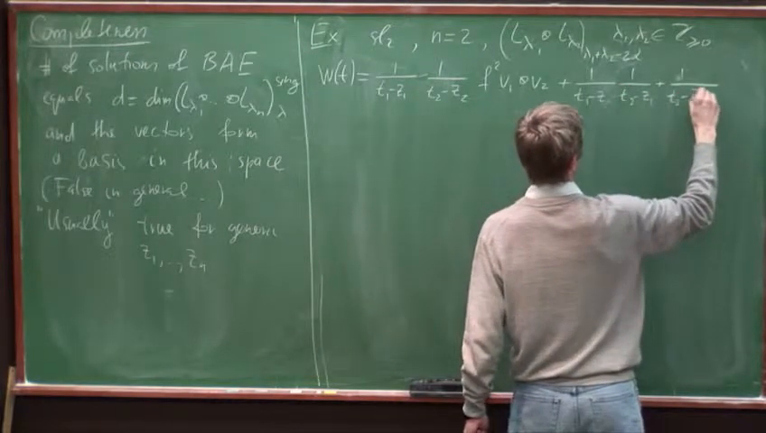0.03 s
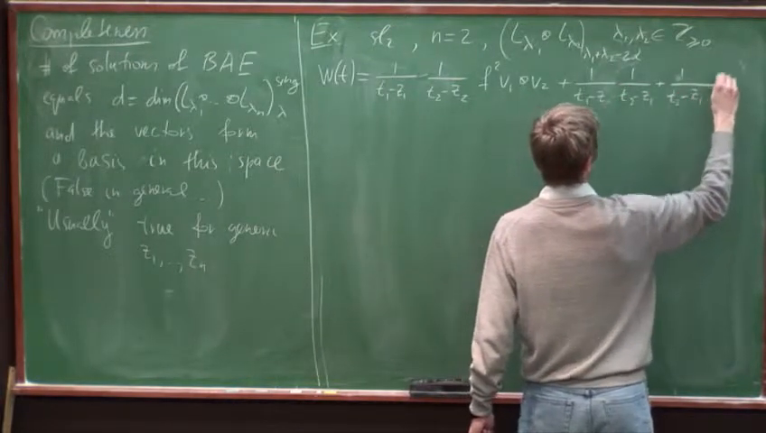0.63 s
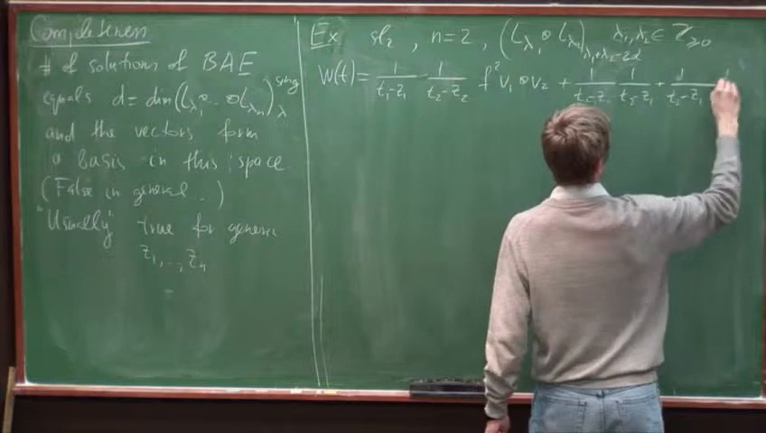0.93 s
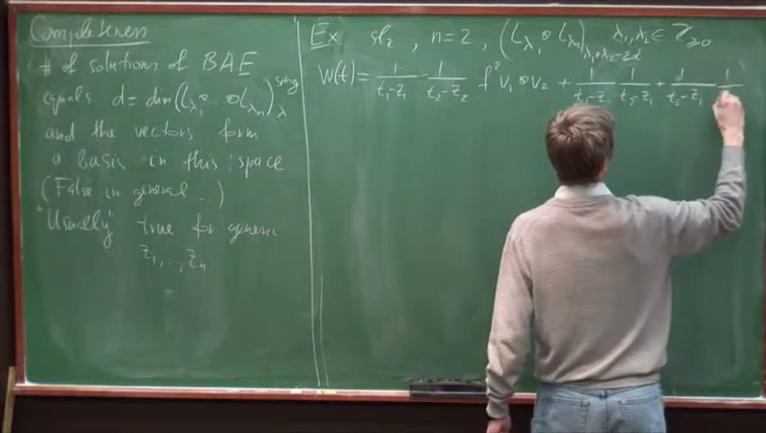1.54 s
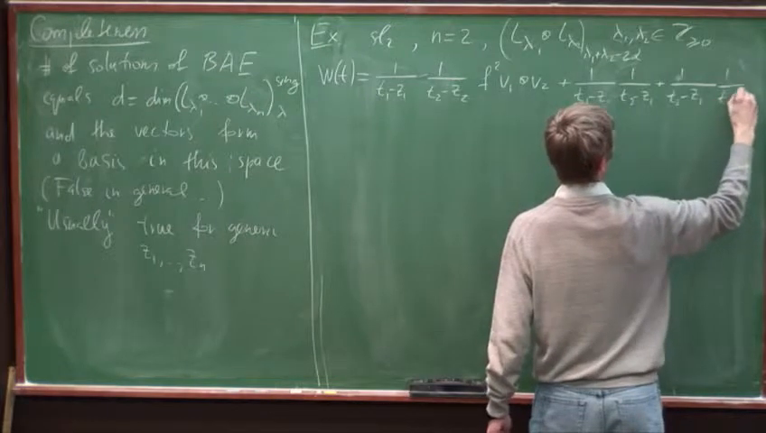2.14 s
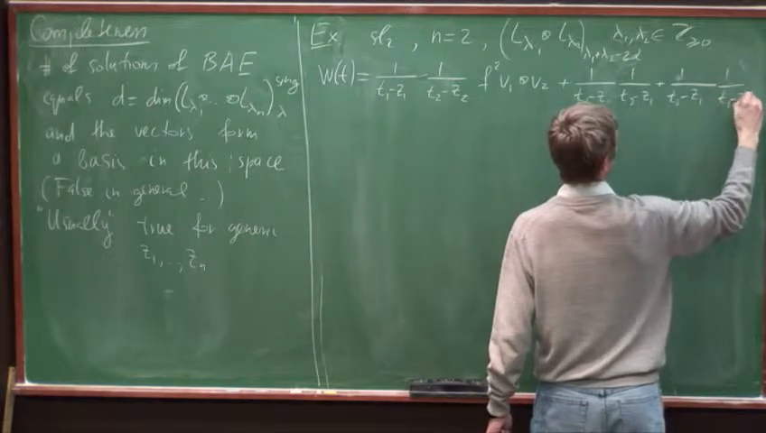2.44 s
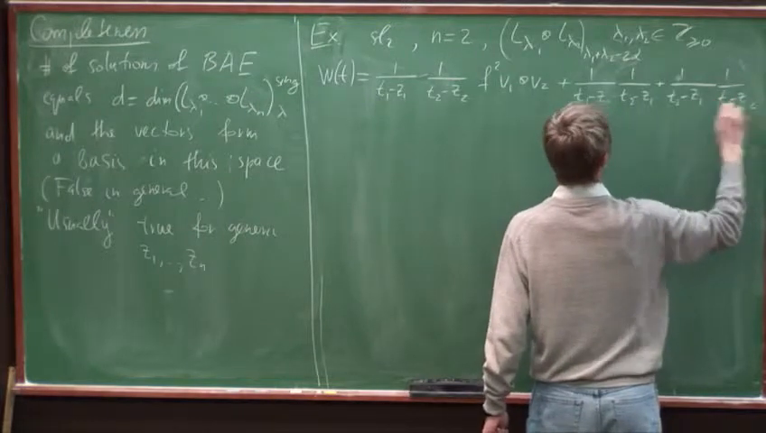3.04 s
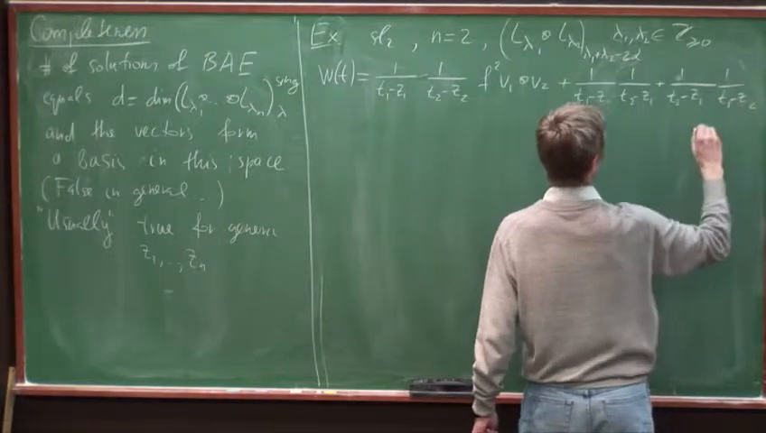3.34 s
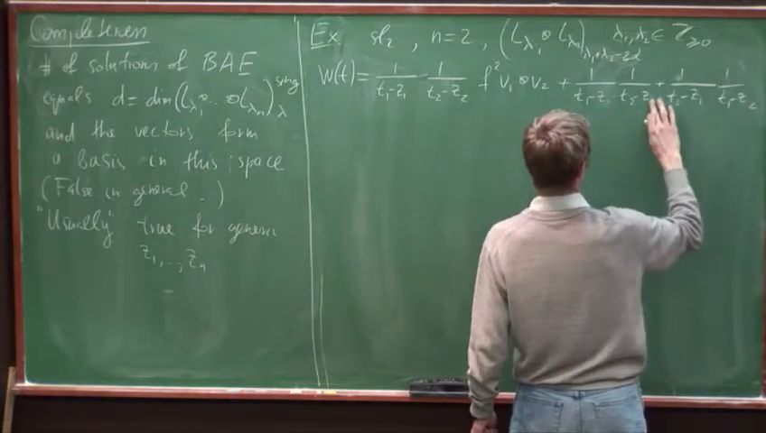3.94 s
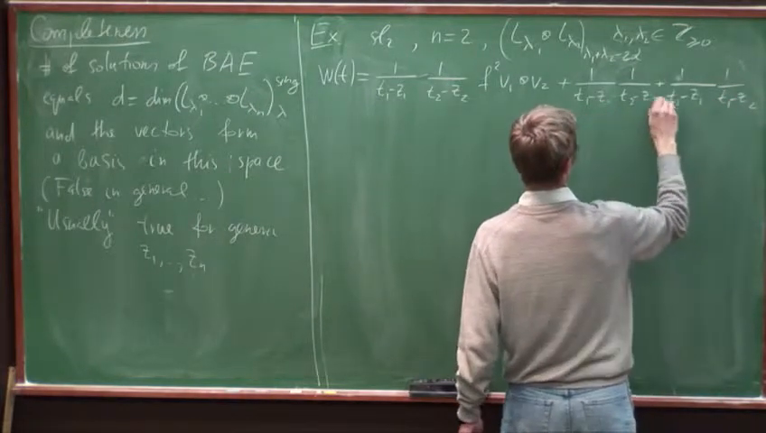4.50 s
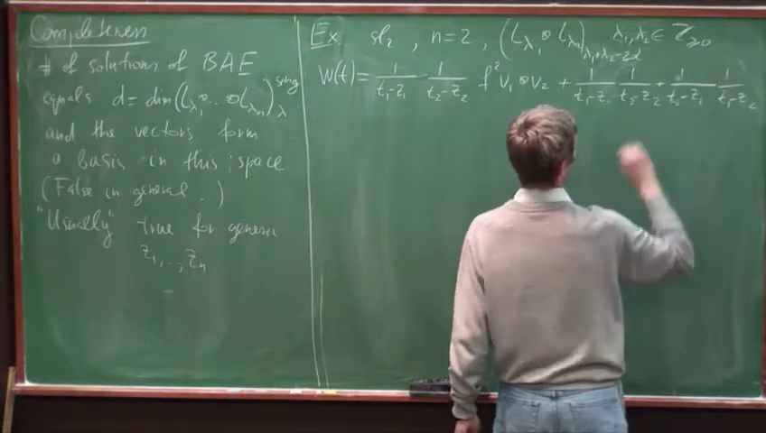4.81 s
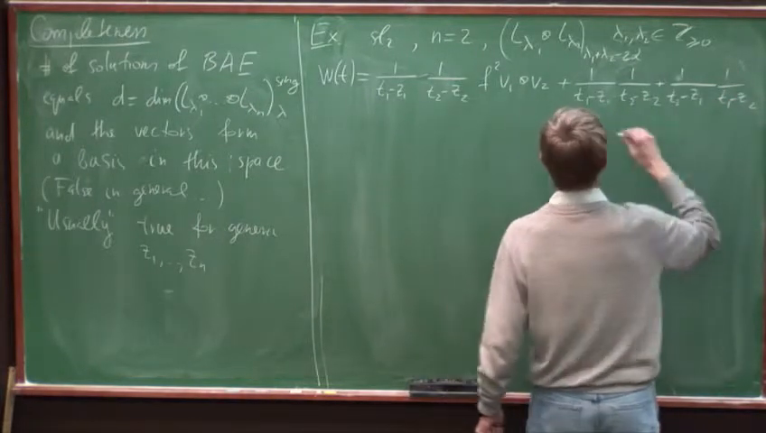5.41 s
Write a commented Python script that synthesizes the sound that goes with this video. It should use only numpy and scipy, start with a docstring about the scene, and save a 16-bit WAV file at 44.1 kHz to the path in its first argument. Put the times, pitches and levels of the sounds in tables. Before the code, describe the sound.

A quick run of sharp chalk knocks on a blackboard, then a short pause and a last tap and scrape, with faint ventilation behind.

```python
"""A lecture room, one microphone at the blackboard (left) and one four metres further off (right).
Chalk taps out a formula: each touch knocks the panel, sets it ringing and fills the room.
Light strokes hiss in between, and small things click and bump near the far microphone.
Ventilation hums; in the pause a noise gate shuts out the room, leaving the electronics' buzz and hiss."""
import sys
import numpy as np
from scipy import signal
from scipy.fft import rfft, irfft
from scipy.io import wavfile
from scipy.ndimage import uniform_filter1d

SR = 44100
rng = np.random.default_rng(int(sys.argv[2]) if len(sys.argv) > 2 else 0)


def wav_out(sig):
    """Save sig, one row per channel (or a flat mono array), as 16-bit PCM at SR to the path in sys.argv[1]."""
    wavfile.write(sys.argv[1], SR, np.round(np.clip(np.atleast_2d(sig).T, -1, 1) * 32767).astype(np.int16))


N = 245346
TIME = np.arange(N) / SR


def from_db(db):
    """Decibels to gain."""
    return 10 ** (np.asarray(db) / 20)


def at_hz(points, hz):
    """Read a table along a log-frequency axis."""
    points = np.array(points)
    return np.interp(np.log(hz), np.log(points[:, 0]), points[:, 1])


def bins(size):
    """The frequencies of a transform, kept above zero."""
    return np.maximum(np.fft.rfftfreq(size, 1 / SR), 1)


def noise(gain, size):
    """Noise with a gain for each frequency; rms near 1."""
    return irfft(rfft(rng.standard_normal(size)) * gain / np.sqrt(np.mean(gain ** 2)), size)


def shaped(spectrum, size):
    """Noise that follows the shape of a spectrum table; rms near 1."""
    return noise(from_db(at_hz(spectrum, bins(size))), size)


def add(track, s, sound):
    """Mix a sound into a track from a given moment on."""
    start = max(round(s * SR), 0)
    track[start:start + len(sound)] += sound[:N - start]


def delayed(x, s):
    """The same sound, later."""
    return np.interp(TIME - s, TIME, x, left=0)


def high_pass(x, hz, order):
    """Thin out the bass."""
    return signal.sosfilt(signal.butter(order, hz, "high", fs=SR, output="sos"), x)


def dying(t, t60):
    """A decay of 60 dB in t60."""
    return np.exp(-np.log(1000) * t / t60)


def mode(hz, db, t60, t):
    """A struck mode: one decaying sine."""
    return from_db(db) * np.sin(2 * np.pi * hz * t) * dying(t, t60)


def fade_by_band(x, t60s):
    """Each region of the spectrum dies away at its own rate."""
    size = len(x)
    centres, times = np.transpose(t60s)
    spectrum, log_hz, t = rfft(x), np.log(bins(size)), np.arange(size) / SR
    shares = [np.interp(log_hz, np.log(centres), row) for row in np.eye(len(centres))]
    return sum(irfft(spectrum * share, size) * dying(t, t60) for share, t60 in zip(shares, times))


def swell(length, size):
    """A quick rise and softer fall that last a given time."""
    return np.sin(np.pi * np.sqrt(np.minimum(np.arange(size) / SR / length, 1)))


def burst(length, hz, width_hz, size):
    """A short swell of noise in one broad, steep-sided resonance."""
    f = bins(size)
    return swell(length, size) * noise(1 / (1 + ((f - hz ** 2 / f) / width_hz) ** 2), size)


# air rush at both microphones: f/Hz, relative density/dB
AIR_RUSH = [(25, -13), (60, 1), (80, 0), (100, -0.5), (160, 0.5), (220, 5), (300, 2.5), (500, 0.5),
            (900, -2), (1500, -6.5), (3000, -13), (6000, -15), (15000, -20)]
# fan motor: f/Hz, level at the board/dB, level far off/dB (both before the hum's envelope)
FAN_MOTOR = (119.5, -67, -73.5)
# duct drones: f/Hz, width/Hz, level at the board/dB, level far off/dB (likewise)
DUCT_DRONES = [(117, 51, -69.5, -83), (147, 17, -63.5, -87), (175.7, 9.7, -69.5, -84)]


def ventilation(near_db=-66.5, far_db=-68, hum_db=1.2, hold_s=2.4, sink_db_per_s=2):
    """Room tone: steady air rush, with a motor hum and wavering duct drones that hold, then sink."""
    rush = np.array([from_db(db) * shaped(AIR_RUSH, N) for db in (near_db, far_db)])
    motor_hz, *motor_db = FAN_MOTOR
    hum = from_db(motor_db)[:, None] * np.sqrt(2) * np.sin(2 * np.pi * motor_hz * TIME)
    for hz, width, *mics_db in DUCT_DRONES:
        resonance = 1 / (1 + ((bins(N) - hz) / width) ** 2) ** 2
        hum += from_db(mics_db)[:, None] * noise(resonance, N)
    envelope = from_db(hum_db - sink_db_per_s * np.maximum(TIME - hold_s, 0))
    return rush + hum * envelope


# outline of the mains harmonics: f/Hz, level of each/dB
MAINS_BUZZ = [(60, -103), (120, -103), (180, -90.5), (300, -92), (500, -92), (800, -97), (1150, -106),
              (2400, -114)]
# thin whines: f/Hz, level/dB
WHINE_TONES = [(1767, -89.5), (3536, -95), (7084, -106), (8861, -106)]
# each channel's noise floor: f/Hz, relative density/dB
CHANNEL_HISS = [(15, 27.5), (30, 25.5), (70, 9), (300, 0), (2000, 4), (8000, 2.5), (15000, 3.5)]


def electronics(mains_hz=59.9, hiss_db=-74.5, smear_cycles=0.094):
    """Mains buzz (one blurred pulse a cycle) and whines common to both channels; each has its own hiss."""
    harmonics = [(hz, at_hz(MAINS_BUZZ, hz)) for hz in mains_hz * np.arange(1, 31)]
    tones = np.zeros(N)
    for hz, db in harmonics + WHINE_TONES:
        cycles = hz * TIME + smear_cycles * rng.standard_normal()
        tones += np.sqrt(2) * from_db(db) * np.sin(2 * np.pi * cycles)
    return tones + from_db(hiss_db) * np.array([shaped(CHANNEL_HISS, N), shaped(CHANNEL_HISS, N)])


# light strokes, close to the board microphone: t/s, length/s, level/dB
LIGHT_STROKES = [(0.0, 0.2, -63.5), (2.471, 0.081, -64), (4.532, 0.013, -53), (4.716, 0.12, -55.5),
                 (5.242, 0.13, -73)]
# sliding chalk: f/Hz, relative density/dB
CHALK_SCRAPE = [(150, 1), (500, 3.5), (1400, 3.5), (2600, -3.5), (4000, -18), (5800, -19), (7000, -8),
                (8500, -23), (14000, -32)]


def chalk_strokes(drag_after_s=.06, drag_s=.04, drag_db=-60, grain_db=4, size=4096):
    """Sliding chalk crumbles in uneven grains, in light strokes and in a brief drag after each tap."""
    out = np.zeros(N)
    drags = [(s + drag_after_s, drag_s, drag_db + strength_db) for s, strength_db, *_ in CHALK_TAPS]
    for s, length, db in LIGHT_STROKES + drags:
        grains = from_db(grain_db * noise(1. * (bins(size) < 400), size))
        add(out, s, from_db(db) * swell(length, size) * grains * shaped(CHALK_SCRAPE, size))
    return out


# chalk landing by the board microphone: t/s, strength/dB, hardness/(dB per octave), knock offset/dB
CHALK_TAPS = [(0.0767, -2, -1.9, -3), (0.288, -4, -2, -4), (0.9029, 0, 2.5, 6.5), (1.1048, -2.5, 0.7, 0.5),
              (1.423, -4.5, -2.8, -1), (1.7125, -1, -0.8, -6.5), (1.8678, -6, 2.5, -0.5),
              (2.098, 1, -2.5, 0), (2.3143, -4, 0.9, 4), (2.6283, -3.5, 1.6, 5.5), (2.8565, -3.5, 3, 1.2),
              (4.5421, -3.5, -3, -4)]
# the tick of stick and panel: f/Hz, relative level/dB, t60/s
TICK_MODES = [(340, -65, 0.014), (1890, -24, 0.0037), (2310, -23, 0.008), (2850, -24.5, 0.0018),
              (4120, -36.5, 0.0055), (6940, -33.5, 0.0081), (8250, -37, 0.0033), (9570, -56, 0.0026)]
# the panel's dense ringing: f/Hz, relative density/dB
RING_SPECTRUM = [(60, -35), (120, -5), (200, -5), (330, -2), (560, -0.5), (800, 1.5), (1250, 0.5),
                 (2000, -2), (2900, -8.5), (4300, -18), (5800, -25.5), (7200, -26), (9500, -31),
                 (14000, -51.5)]
# how long it rings: f/Hz, t60/s
RING_T60 = [(150, 0.67), (500, 0.32), (1400, 0.34), (3500, 0.23), (8000, 0.19)]
# the panel's strongest modes: f/Hz, relative level/dB, t60/s
RING_MODES = [(144.5, -56.5, 0.66), (244, -46.5, 0.38), (290, -59, 0.2), (343.2, -41.5, 0.25),
              (409.7, -43.5, 0.37), (507.6, -43.5, 0.32), (675, -51.5, 0.52), (1049, -31, 0.071),
              (1284, -47, 0.25), (1493, -35, 0.062), (1686, -64, .16), (2210, -55, 0.092)]


def chalk_taps(knock_hz=1263, knock_db=-21.5, knock_t60_s=0.014, tick_db_per_hardness=1.88,
               ring_db=-30, pivot_hz=1300, spread_s=0.0024, size=32768):
    """The chalk lands: a knock and tick at the spot, then waves spread through the panel. Returns both."""
    spot, panel = np.zeros(N), np.zeros(N)
    t = np.arange(size) / SR
    octaves_up = np.log2(np.maximum(bins(size) / pivot_hz, 1))
    for s, strength_db, hardness, offset_db in CHALK_TAPS:
        knock = mode(knock_hz, knock_db + offset_db, knock_t60_s, t)
        tick = sum((-1) ** k * mode(hz, db + tick_db_per_hardness * hardness + rng.normal(0, 3.6), t60, t)
                   for k, (hz, db, t60) in enumerate(TICK_MODES))
        add(spot, s, from_db(strength_db) * (knock + tick))
        # a harder contact is shorter and reaches higher
        contact = from_db(hardness * octaves_up)
        excitation = irfft(rfft(shaped(RING_SPECTRUM, size)) * contact)
        ringing = from_db(ring_db) * fade_by_band(excitation, RING_T60)
        for hz, db, t60 in RING_MODES:  # each spot weights the modes anew
            ringing += rng.choice([-1, 1]) * mode(hz, db + rng.normal(0, 2), t60, t)
        add(panel, s, from_db(strength_db) * ringing * (1 - np.exp(-t / spread_s)))
    return spot, panel


# the lecture room's reverberation: f/Hz, t60/s
ROOM_DECAY = [(150, 0.8), (500, 0.48), (1400, 0.58), (3500, 0.41), (8000, 0.49)]


def room(x, build_s, early_db, first_s=.012, early_t60=0.18, size=32768):
    """Reflections at one microphone: a cluster off walls and desks, then a tail, longest in the bass."""
    t = np.arange(size) / SR
    early = from_db(early_db) * rng.standard_normal(size) * dying(t, early_t60)
    tail = fade_by_band(rng.standard_normal(size), ROOM_DECAY)
    response = (early + tail) * (1 - np.exp(-t / build_s))
    response /= np.sqrt(np.sum(response ** 2))
    return delayed(signal.fftconvolve(x, response)[:N], first_s)


# small things by the far microphone: t/s, click level/dB, rustle level/dB, f/Hz, width/Hz
FAR_CLICKS = [(0.839, -62, -76, 6550, 3200), (1.333, -51.5, -57, 5840, 4840), (3.564, -51, -64, 2900, 6500),
              (3.675, -55, -57, 2350, 5000), (3.7513, -43.5, -73, 6140, 2000),
              (4.887, -66, -67.5, 8240, 3500)]
# soft bumps by the far microphone: t/s, level/dB
FAR_BUMPS = [(1.228, -51), (1.26, -43.5), (1.32, -51)]


def handling(click_s=0.006, rustle_s=0.053, bump_hz=206, bump_t60_s=0.12, size=8192):
    """Small things handled away from the board: clicks, each with a rustle after it, and dull bumps."""
    out = np.zeros(N)
    for s, click_db, rustle_db, hz, width_hz in FAR_CLICKS:
        add(out, s, from_db(click_db) * burst(click_s, hz, width_hz, size))
        add(out, s + click_s, from_db(rustle_db) * burst(rustle_s, hz, width_hz, size))
    for s, db in FAR_BUMPS:
        add(out, s, mode(bump_hz, db, bump_t60_s, np.arange(size) / SR))
    return out


def gate(x, threshold_db=-47, hold_s=0.92, release_s=0.36, ahead_s=0.0035, size=256):
    """A noise gate, open at first: opens just ahead of a loud sound at the board, holds, fades shut."""
    loud = uniform_filter1d(x[0] ** 2, size) > from_db(threshold_db) ** 2
    quiet_for = TIME - np.maximum.accumulate(TIME * loud)
    gain = np.clip(1 - (quiet_for - hold_s) / release_s, 0, 1) ** 2
    return x * np.interp(TIME + ahead_s, TIME, uniform_filter1d(gain, size))


def scene(far_lag_s=.011, far_direct_db=-13, near_room_db=-10, far_room_db=-7,
          echo_lag_s=.0089, echo_db=-9, board_low_hz=115):
    """The near microphone is at the board; four metres off, the far one hears it late, mostly as room."""
    spot, panel = chalk_taps()
    # a thin panel radiates little bass, and less still into the distance
    spot = high_pass(spot, board_low_hz, order=2)
    panel = high_pass(panel + chalk_strokes(), board_low_hz, order=4)
    board, small_things = spot + panel, handling()
    into_room = high_pass(panel + from_db(-4) * spot + from_db(-1) * small_things, hz=260, order=1)
    # a small hard surface throws the treble of each tick back
    echo = from_db(echo_db) * delayed(high_pass(spot, hz=1400, order=2), echo_lag_s)
    near = board + echo + from_db(-16) * delayed(small_things, far_lag_s)
    near += from_db(near_room_db) * room(into_room, build_s=0.018, early_db=-12)
    far = from_db(far_direct_db) * delayed(board, far_lag_s) + small_things
    far += from_db(far_room_db) * room(into_room, build_s=0.0049, early_db=5.5)
    return np.array([near, far]) + ventilation()


def record(dry, cutoff_hz=15800):
    """Behind the microphones: the gate, the noise of the electronics, and a steep cut at the top."""
    low_pass = signal.ellip(12, .1, 80, cutoff_hz, fs=SR, output="sos")
    return signal.sosfilt(low_pass, gate(dry) + electronics())


dry = scene()
out = record(dry)
wav_out(out)
```